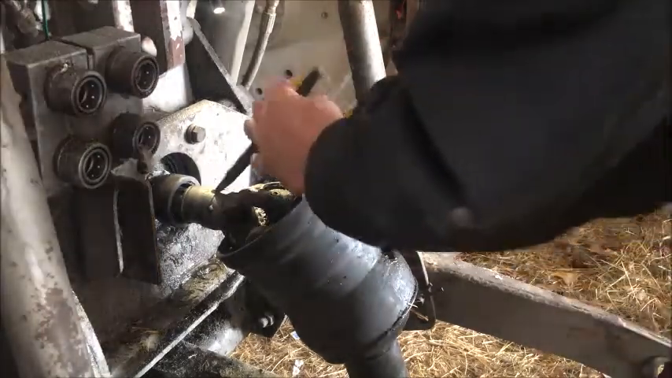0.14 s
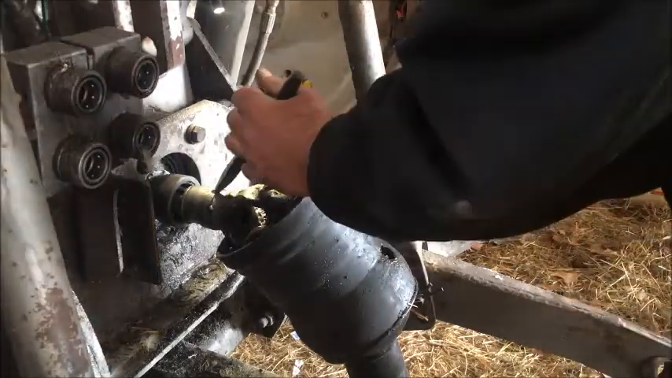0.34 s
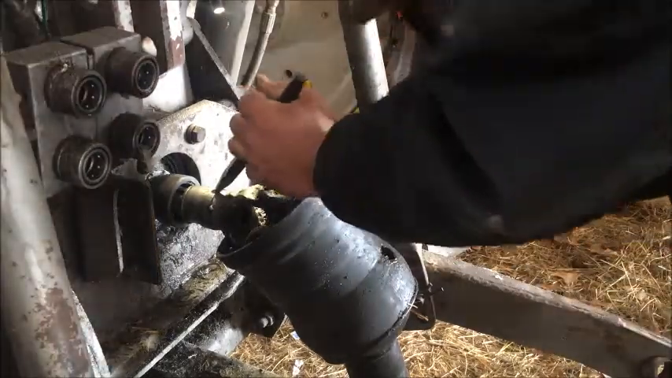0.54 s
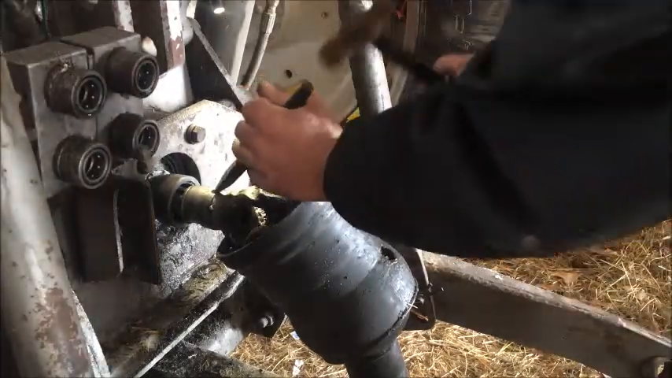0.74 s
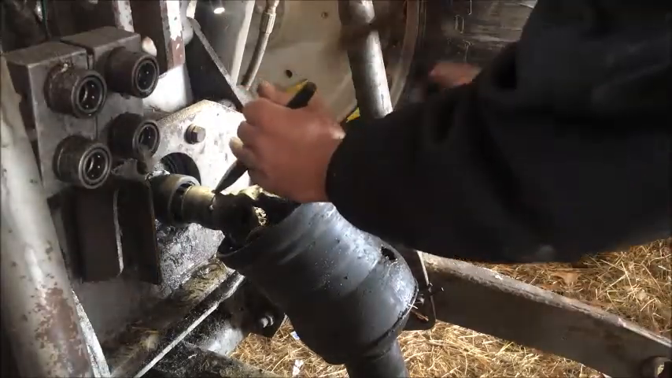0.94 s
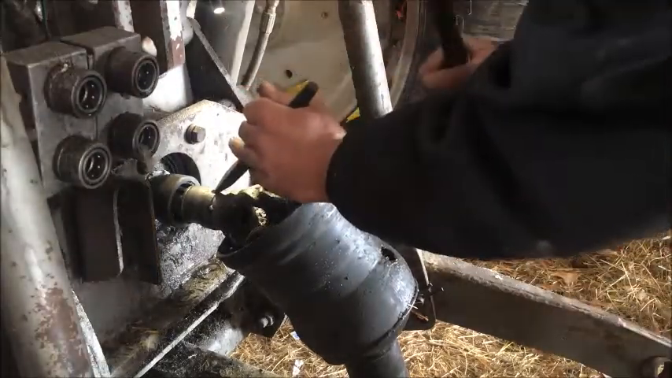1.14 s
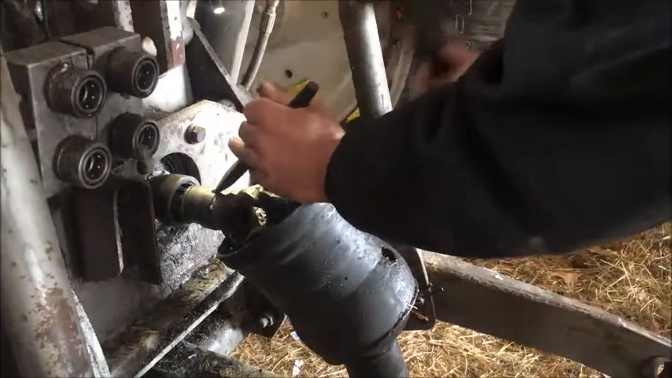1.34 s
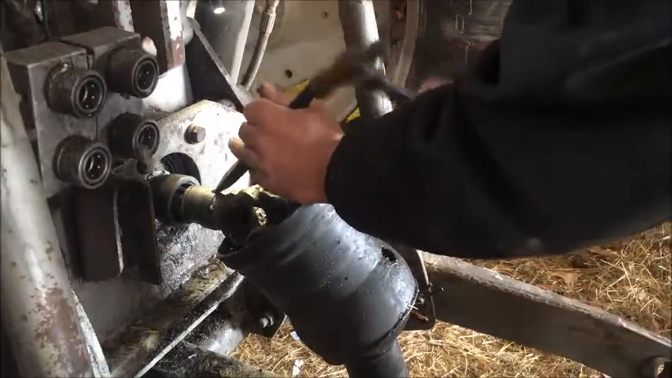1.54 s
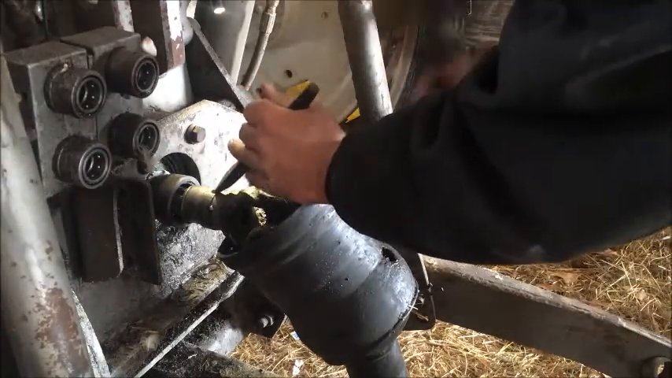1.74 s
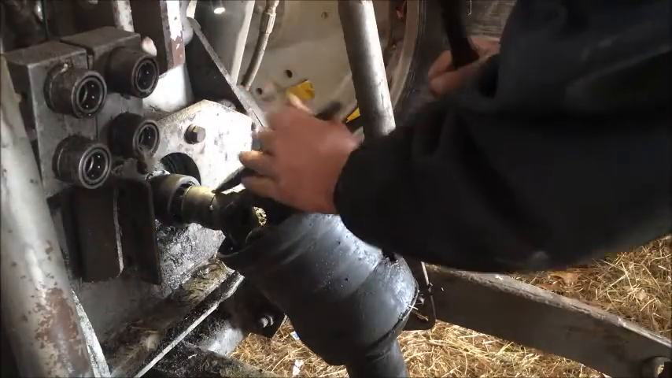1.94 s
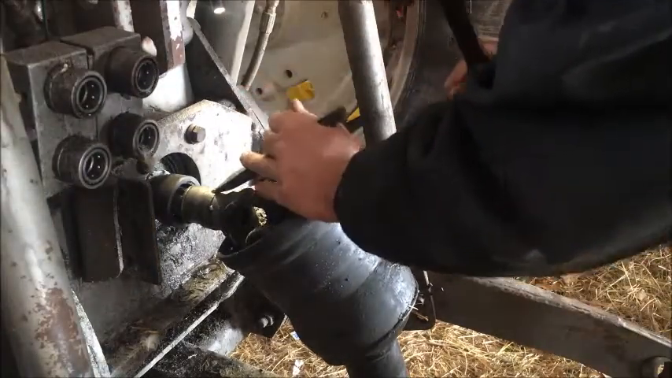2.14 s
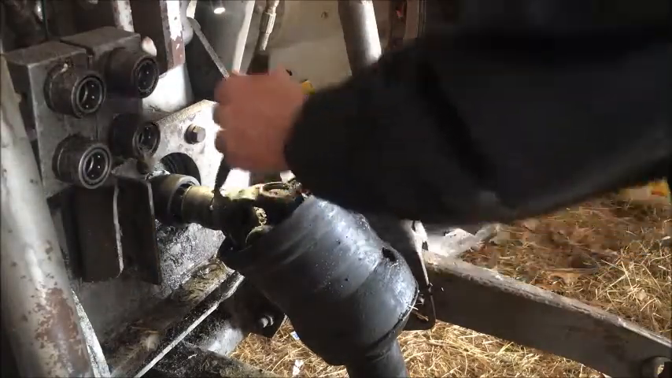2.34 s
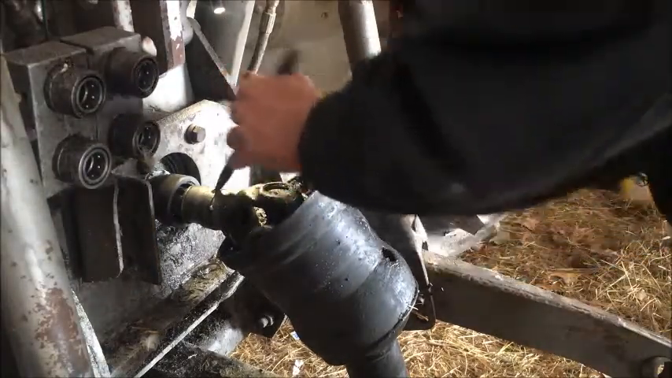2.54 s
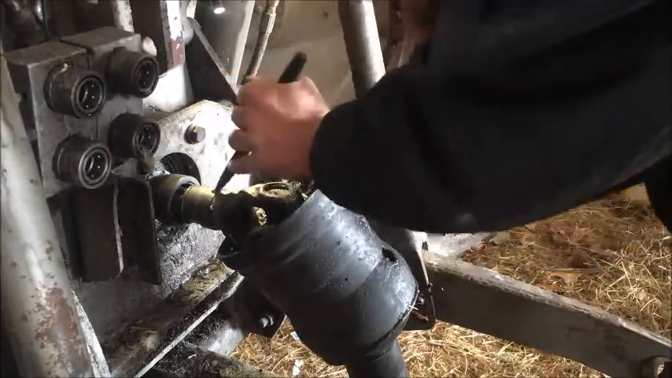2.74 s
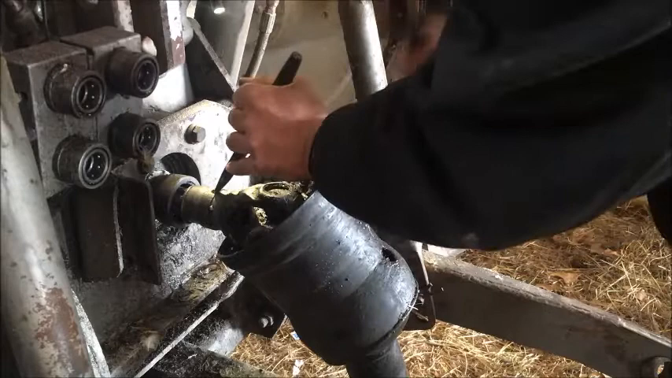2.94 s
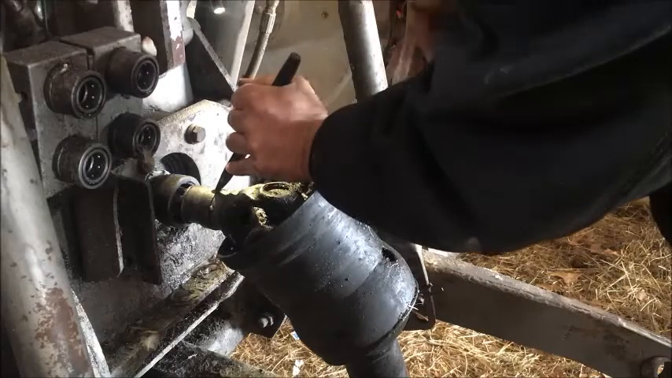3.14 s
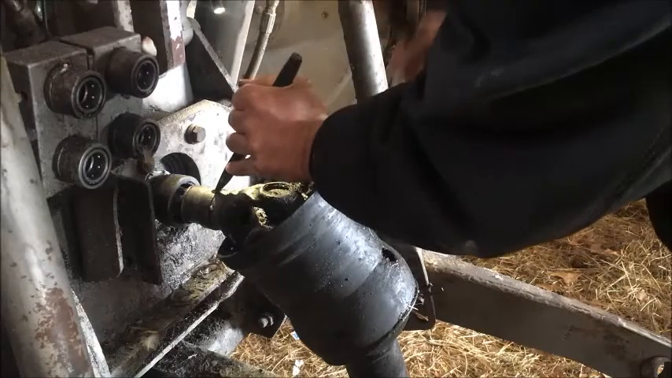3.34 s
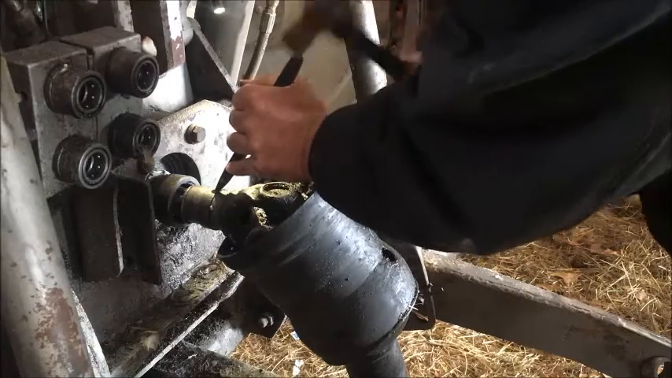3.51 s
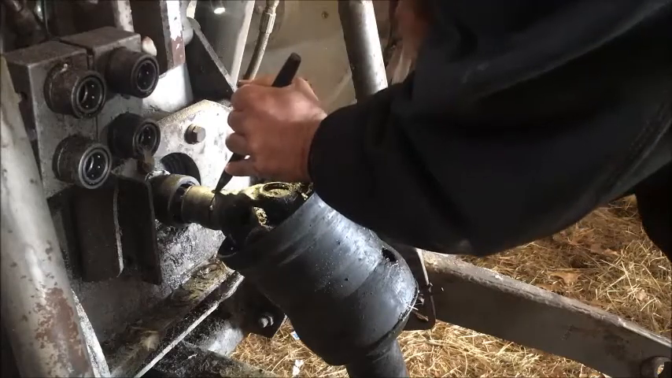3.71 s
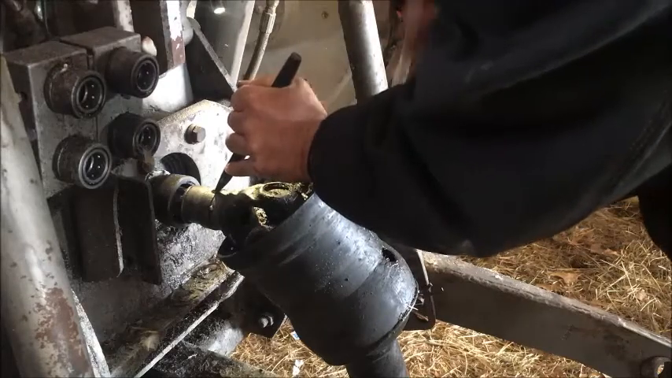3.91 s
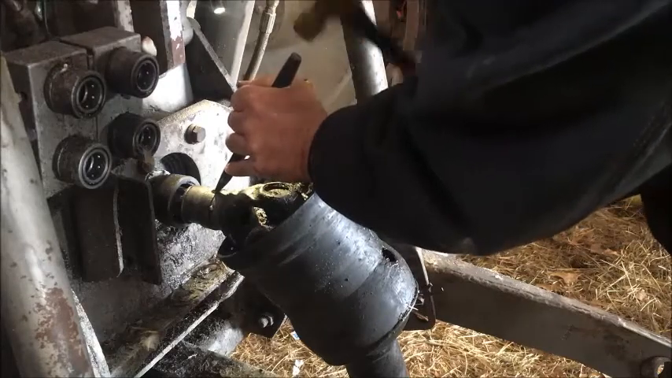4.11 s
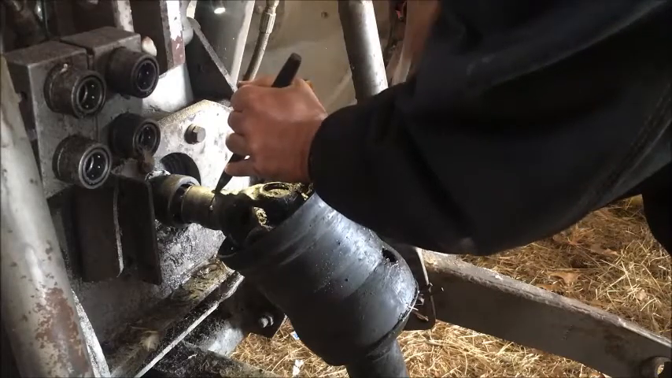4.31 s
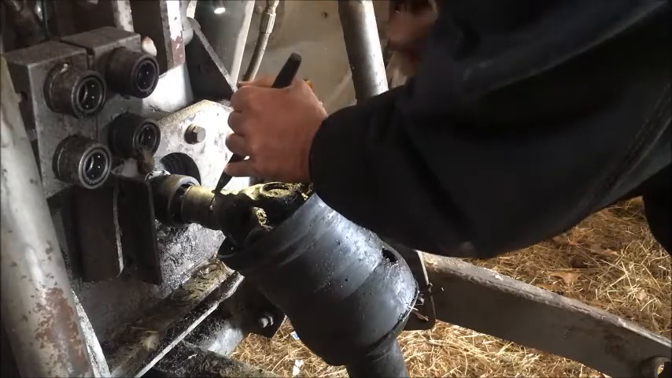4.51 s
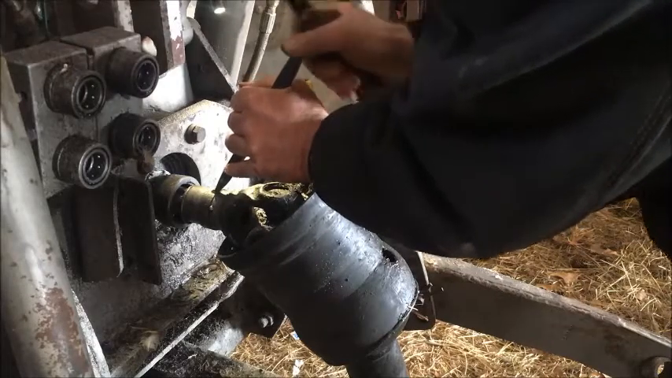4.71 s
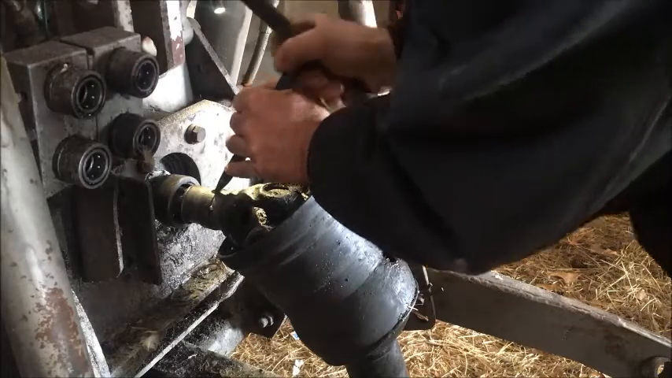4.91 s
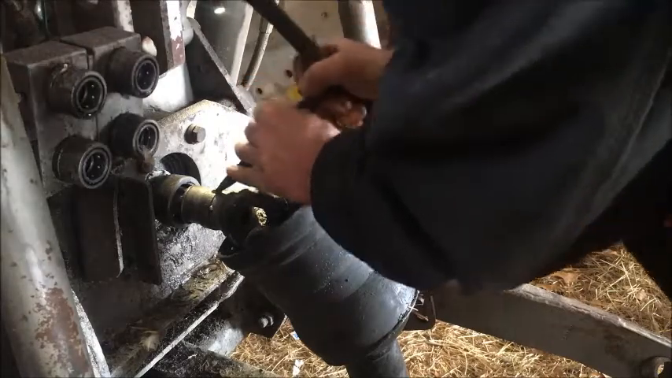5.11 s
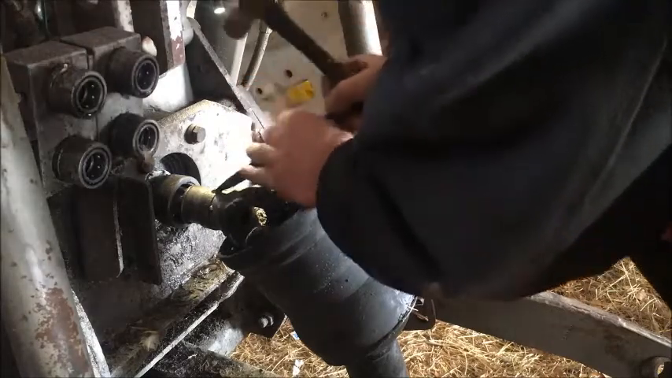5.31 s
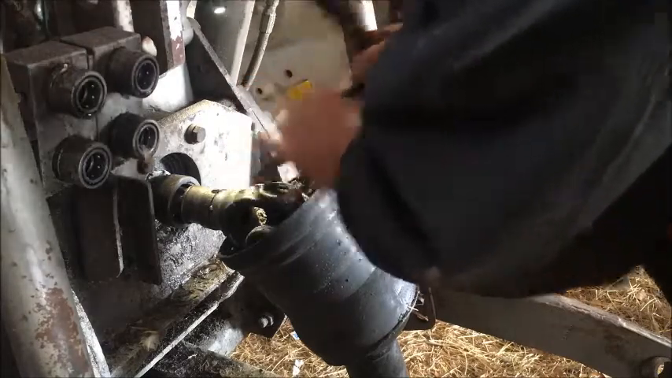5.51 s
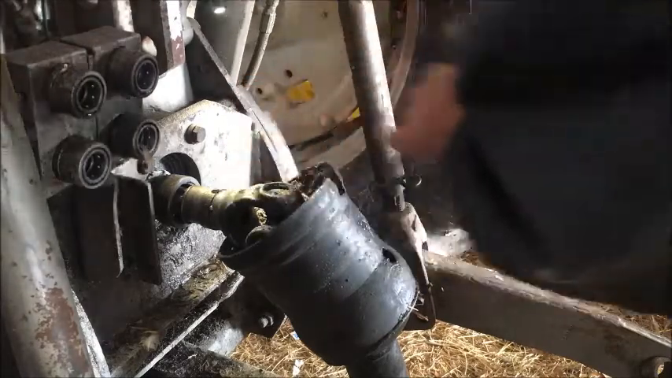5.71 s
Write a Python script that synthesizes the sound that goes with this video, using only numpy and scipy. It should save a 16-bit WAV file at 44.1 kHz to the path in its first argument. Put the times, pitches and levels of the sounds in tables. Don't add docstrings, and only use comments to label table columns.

```python
import sys
import numpy as np
from scipy import signal
from scipy.fft import rfft, irfft
from scipy.io import wavfile
from scipy.ndimage import uniform_filter1d

SR = 44100
rng = np.random.default_rng(int(sys.argv[2]) if len(sys.argv) > 2 else 0)


def store_pcm(level_fs):
    pcm = np.round(np.clip(level_fs, -1, 1) * 32767).astype(np.int16)
    wavfile.write(sys.argv[1], SR, np.atleast_2d(pcm).T)


def boost(x):
    u = np.asarray(x, float) / 20
    return 10 ** u


N = 254009

# (time [s], rate [Hz])
FIRING_RATE = [(0.0, 45.33), (5.76, 44.48)]
# (frequency [Hz], gain [dB])
EXHAUST = [(30, -72), (38, -30.5), (45, -15), (65, -11), (90, -6), (135, -12.5), (180, -34), (225, -16),
           (280, -35), (400, -54), (900, -100)]
# (frequency [Hz], density [dB])
RUMBLE = [(18, -19.5), (30, 1.5), (67, -0.5), (115, -7), (178, -10), (231, -19.5), (392, -30.5),
          (436, -27.5), (700, -31), (910, -60), (1540, -120)]
# (frequency [Hz], density [dB])
CLATTER = [(180, -26), (300, 1.5), (634, -3.5), (701, -6.5), (842, 0.5), (1030, -3.5), (1210, -1),
           (1580, -4.5), (2210, 0.5), (2740, -10.5), (4370, -24.5), (5430, -7), (6960, -19.5),
           (13500, -29.5), (16000, -32)]

# (start [s], length [s], level [dB])
STROKES = [(0.0, 0.18, -61), (0.598, 1.62, -60), (2.6, 2.03, -58.5), (0.166, 0.2, -50.5),
           (0.297, 0.25, -50.5), (0.496, 0.27, -54), (0.752, 0.12, -48.5), (0.84, 0.14, -52),
           (2.03, 0.049, -54), (2.24, 0.052, -53), (2.315, 0.086, -56.5), (2.42, 0.094, -52),
           (2.543, 0.13, -52.5), (2.653, 0.27, -59), (4.636, 0.1, -48), (4.74, 0.27, -54.5),
           (5.012, 0.13, -49.5), (5.217, 0.12, -55), (5.433, 0.18, -49.5), (5.55, 0.45, -45.5)]
# (time [s], level [dB])
CREASES = [
    (0.052, -49),
    (0.092, -53),
    (0.316, -41),
    (0.888, -55),
    (2.656, -56),
    (4.873, -50),
]
# (frequency [Hz], density [dB])
CLOTH = [(1500, -20.5), (3000, 1.5), (6000, 0), (10000, 0.5), (14000, 1), (16000, 3.5)]
# (frequency [Hz], density [dB])
CREASE_SPECTRUM = [(6000, -25), (11000, -14), (15000, 0)]
CLOTH_REST_DB, CREASE_S = -67, 0.005
STROKE_RISE, STROKE_RELEASE_S = 0.47, 0.016

# (time [s], peak [dB], chisel ring [Hz], chisel ring [dB], head roll toward its side [dB])
BLOWS = [
    (1.048, -4, 3140, -13, -1),
    (1.31, -2.5, 3530, 0.5, 0),
    (1.581, -1.5, 3525, 3, 7),
    (1.855, -0.5, 3482, 0, 5.5),
    (3.057, -5, 3110, -5.5, -4),
    (3.332, -2.5, 3350, -16, -3),
    (3.585, -2, 3290, -1.5, 7.5),
    (3.88, -2, 3098, -1, 6),
    (4.165, -2, 3096, -4.5, 2),
    (4.445, -2.5, 3120, -3, 11),
]
# (until [s], overtone [Hz], overtone rise [dB], face ring [dB], thump [dB])
SEATS = [
    (2.5, 6510, 14.5, -2.5, -1),
    (5.76, 6165, 2, 1.5, 0.5),
]
# (frequency [Hz], density [dB])
CRACK = [(150, -43), (250, -23.5), (988, -1.5), (2360, -2.5), (3120, 1), (4570, -3), (5930, -1),
         (6470, -3.5), (7980, -8), (12300, -2.5), (13700, -26), (14900, 3), (16000, -41)]
# (frequency [Hz], rise over crash [dB], t60 [s])
SHAFT = [(144.8, 11.5, 0.21), (201, -3, 0.046), (373, 4.5, 0.022), (507, 7, 0.047), (679, 4.5, 0.05),
         (940, 3, 0.028), (1048, -1.5, 0.049), (1398, 2, 0.046), (1470, -13, 0.022), (3130, -10, 0.13),
         (3390, -2, 0.094), (6470, -10, 0.015)]
# (frequency [Hz], rise over crash [dB], t60 [s])
HEAD = [(11770, 15, .07), (12655, 12, .04)]
# (frequency [Hz], rise [dB], t60 [s])
COLLAR = [(3040, 2.5, 0.077), (3290, -1.5, 0.077)]
# (frequency [Hz], t60 [s])
SHED_T60 = [(150, 0.21), (500, 0.26), (1400, 0.23), (3700, 0.36), (9000, 0.2), (15000, 0.25)]
# (frequency [Hz], density [dB])
WASH = [(59, -57), (100, 1), (185, -2), (266, -12), (801, -6.5), (950, -7.5), (2080, -4.5), (3120, -4.5),
        (5530, -7), (6420, -3.5), (7940, -11), (12700, -15.5), (16000, -13)]
# (frequency [Hz], gain [dB])
GHOST = [(300, 2), (3000, -3.5), (9000, -5.5), (16000, -3)]
SEAT_BRIGHT_DB, SEAT_TOP_DB, SEAT_EDGE_DB = (0.5, 1), (-8, -7), (2, -6)
SEAT_COLLAR_DB, SEAT_GHOST_DB = (-6, 2.5), (-1, 3.5)
CONTACT_DB, CONTACT_S = 3, 0.0004
REBOUND_S, REBOUND_DIP = 0.0022, 0.3
SING_DB, SING_S = -16.5, 0.003
SIDE_DB, EDGE_DB, EDGE_HZ = -1, 8, 14600
FACE_PER_ROLL, EDGE_PER_ROLL = -0.54, -1.1
GHOST_SAMPLES = 1024

# (time [s], knock [dB], knock [Hz], knock ring [dB], thin ring [dB])
TAPS = [
    (2.422, -25.5, 6050, -46, -70),
    (4.692, -35, 3420, -37, -70),
    (5.474, -36, 5950, -48, -62),
    (5.486, -40, 5560, -52, -62),
    (5.497, -43, 9600, -44, -45),
    (5.508, -41, 5100, -46, -36),
    (5.517, -40, 5100, -41, -40),
    (5.526, -27.5, 5300, -34, -35),
    (5.538, -30, 5070, -32, -32),
    (5.562, -41, 5500, -46, -47),
]
# (frequency [Hz], rise [dB], t60 [s])
TOOL = [(1050, 8, 0.006), (1350, 9, 0.006), (3050, 11, 0.01), (3850, 8, 0.008), (5100, 8, 0.006)]
# (frequency [Hz], level [dB], t60 [s])
TINKLE = [(8940, 0, .05), (13190, -4, .05), (15140, -18, .03)]

# (frequency [Hz], density [dB])
DRAG_SPECTRUM = [(600, -27), (1000, -9), (2500, -3), (4000, -14), (5100, 1), (6500, -5), (9500, -11),
                 (14000, -8)]
DRAG_START_S, DRAG_END_S, DRAG_DB = 5.455, 5.565, -49

# (frequency [Hz], density [dB])
STRAW = [(300, -9), (600, 2), (1500, -3), (3000, -7.5), (6000, -8), (12000, -18)]
STEP_S, STEP_RISE_S, STEP_DB = 5.56, 0.031, -49

# (frequency [Hz], gain [dB])
RECORDER_BAND = [(20, -40), (30, -24), (40, 0), (15700, 0), (15900, -24), (16600, -32), (16900, -70)]


def colour(x, points):
    hz, db = np.transpose(points)
    f = np.maximum(np.fft.rfftfreq(len(x), 1 / SR), 1)
    gain = boost(np.interp(np.log(f), np.log(hz), db))
    return irfft(rfft(x) * gain, len(x))


def level(x, db):
    return x * boost(db) / np.sqrt(np.mean(x ** 2))


def walk(rate_hz):
    k = int(SR / rate_hz)
    steps = np.repeat(rng.standard_normal(N // k + 1), k)
    return 1.5 * uniform_filter1d(uniform_filter1d(steps, k), k)[:N]


def add(track, sound, s):
    i = int(round(s * SR))
    track[i:i + len(sound)] += sound[:len(track) - i]


def resonate(x, modes):
    hz, db, t60 = np.transpose(modes)[:, :, None]
    damping = np.log(1000) / t60
    f = np.fft.rfftfreq(len(x), 1 / SR)
    ring = np.sum(boost(db) * damping / (damping + 2j * np.pi * (f - hz)), axis=0)
    return irfft(rfft(x) * (1 + ring), len(x))


def engine():
    s, hz = np.transpose(FIRING_RATE)
    turns = np.cumsum(np.interp(np.arange(N) / SR, s, hz)) / SR
    phase = turns + 0.049 * walk(40)
    starts = np.flatnonzero(np.diff(np.floor(phase)) > 0)
    pulses = np.zeros(N)
    pulses[starts] = boost(2.2 * rng.standard_normal(len(starts)))
    exhaust = level(colour(pulses, EXHAUST), -42)
    boom = level(np.cos(2 * np.pi * turns) * boost(1.5 * walk(9.2)), -38.5)
    rumble = level(colour(rng.standard_normal(N), RUMBLE), -41)
    throb = 1 + 0.061 * np.cos(2 * np.pi * phase)
    clatter = colour(rng.standard_normal(N) * throb * boost(0.7 * walk(6)), CLATTER)
    return exhaust + boom + rumble + level(clatter, -50.5)


def sleeve():
    t = np.arange(N) / SR
    start, length, db = np.transpose(STROKES)[:, :, None]
    rise = np.clip((t - start) / (STROKE_RISE * length), 0, 1)
    stop = np.exp(-np.maximum(t - start - length, 0) / STROKE_RELEASE_S)
    rub = np.sqrt(boost(CLOTH_REST_DB) ** 2 + np.sum((boost(db) * rise * stop) ** 2, axis=0))
    grains = rng.standard_normal(N) * boost(1.2 * rng.exponential(size=N))
    s, db = np.transpose(CREASES)[:, :, None]
    snaps = np.sum(boost(db) * np.exp(-((t - s) / CREASE_S) ** 2), axis=0)
    sliding = level(colour(grains, CLOTH), 0.5) * rub
    return sliding + level(colour(grains, CREASE_SPECTRUM), 0) * snaps


def chatter(t):
    loose = 1 / (1 + np.exp(np.clip((t - 0.0115) / 0.0015, -50, 50)))
    loose = loose * (1 - REBOUND_DIP * np.exp(-(t / REBOUND_S - 1) ** 2 * 2))
    bounce = loose * np.exp(-t / 0.05) + 0.35 * np.exp(-t / 0.0011) + 0.13 * np.exp(-t / 0.04)
    uneven = boost(2.5 * rng.standard_normal(len(t) // 32 + 1).repeat(32)[:len(t)])
    return colour(bounce * uneven * rng.standard_normal(len(t)), CRACK)


def shed(t):
    hz, t60 = np.transpose(SHED_T60)
    noise = colour(rng.standard_normal(len(t)), WASH)
    noise = noise / np.std(noise)
    out = 0
    for f in 100 * 2 ** np.arange(8):
        octave = [(f / 2, -60), (f / 2 ** 0.5, -6), (f, 0), (f * 2 ** 0.5, -6), (f * 2, -60)]
        decay = boost(-60 * t / np.interp(np.log(f), np.log(hz), t60))
        build_up = 1 - np.exp(-t * f)
        out = out + colour(noise, octave) * decay * build_up
    return out


def hammer_blow(t, run, chisel_hz, chisel_db, roll_db):
    _, over_hz, over_db, face_db, thump_db = SEATS[run]
    crack = chatter(t)
    contact = boost(CONTACT_DB) * np.exp(-t / CONTACT_S) * np.sign(crack)
    chisel = [(chisel_hz, 12 + chisel_db, 0.035), (over_hz, over_db, 0.02), (over_hz * 1.1, over_db - 3.5, 0.02)]
    swell = boost(SING_DB + chisel_db) * (t / SING_S) ** 4 * np.exp(-t / SING_S)
    sing = swell * np.sin(2 * np.pi * chisel_hz * t)
    collar = [(hz, rise_db + SEAT_COLLAR_DB[run], t60) for hz, rise_db, t60 in COLLAR]
    wash = boost(-5.5) * resonate(shed(t), collar)
    crash = resonate(crack / np.std(crack[:512]), chisel) + contact + sing + wash
    (face_hz, face_rise, face_t60), (side_hz, side_rise, side_t60) = HEAD
    head = [(face_hz, face_rise + face_db + FACE_PER_ROLL * abs(roll_db), face_t60),
            (side_hz, side_rise + SIDE_DB + roll_db, side_t60),
            (EDGE_HZ, EDGE_DB + SEAT_EDGE_DB[run] + EDGE_PER_ROLL * roll_db, 0.08)]
    tilt = [(6000, 0.0036), (14500, SEAT_BRIGHT_DB[run]), (15800, SEAT_TOP_DB[run])]
    blow = colour(resonate(crash, SHAFT + head), tilt)
    lows = colour(blow, [(900, 0), (2200, -30)])
    thump = boost(thump_db) * lows * (1 - np.exp(-t / 0.0012))
    return (blow - lows + thump) * np.clip((t[-1] - t) / 0.1, 0, 1)


def blows():
    t, track = np.arange(int(0.4 * SR)) / SR, np.zeros(N)
    lead_s = GHOST_SAMPLES / SR
    quarter = GHOST_SAMPLES // 4
    for s, db, chisel_hz, chisel_db, roll_db in BLOWS:
        run = int(s > SEATS[0][0])
        blow = hammer_blow(t, run, chisel_hz, chisel_db, roll_db)
        blow = blow * boost(db) / np.std(blow[:512])
        add(track, boost(-6) * blow, s)
        ghost = boost(SEAT_GHOST_DB[run]) * colour(blow, GHOST)[:GHOST_SAMPLES]
        ghost = ghost * np.exp(-t[:GHOST_SAMPLES] / 0.0045)
        add(track, boost(-35) * ghost, s - lead_s)
        add(track, boost(-39) * ghost, s - lead_s / 2)
        reversed_onset = (blow * np.exp(-t / 0.0026))[quarter::-1]
        add(track, boost(-31) * reversed_onset, s - lead_s / 4)
    return track


def taps():
    t, track = np.arange(int(0.15 * SR)) / SR, np.zeros(N)
    hz, ring_db, t60 = np.transpose(TINKLE)[:, :, None]
    tick_spectrum = [(500, -20), (900, -0.5), (7000, -17), (14000, -28)]
    for s, db, knock_hz, knock_db, thin_db in TAPS:
        tick = np.exp(-t / 0.003) * colour(rng.standard_normal(len(t)), tick_spectrum)
        knock = boost(knock_db - 60 * t / 0.025) * np.sin(2 * np.pi * knock_hz * t)
        thin = np.sum(boost(thin_db + ring_db - 60 * t / t60) * np.sin(2 * np.pi * hz * t), axis=0)
        add(track, (boost(db) * resonate(tick, TOOL) + knock + thin) * (1 - t / t[-1]), s)
    return track


def drag():
    t = np.arange(N) / SR
    progress = np.clip((t - DRAG_START_S) / (DRAG_END_S - DRAG_START_S), 0, 1)
    push = np.maximum(np.sin(np.pi * progress), 0) ** 0.5
    grains = rng.standard_normal(N) * boost(3.4 * rng.exponential(size=N) + 2.2 * walk(150))
    return level(colour(grains, DRAG_SPECTRUM), DRAG_DB) * push


def straw():
    t = np.arange(N) / SR
    grains = rng.standard_normal(N) * boost(1.5 * rng.exponential(size=N) + 1.5 * walk(40))
    return level(colour(grains, STRAW), STEP_DB) * np.clip((t - STEP_S) / STEP_RISE_S, 0, 1)


def scene():
    return (engine() + sleeve() + blows() + taps() + drag() + straw())[None]


def low_pass(x):
    return signal.sosfilt(signal.butter(12, 16820, fs=SR, output="sos"), x)


def record(dry):
    overloads = np.cumsum(np.abs(dry[0]) > 0.4)
    hold = int(0.193 * SR)
    held = (overloads > np.r_[np.zeros(hold), overloads[:-hold]]) * 1.0
    quick = signal.lfilter([1 / 200], [1, 1 / 200 - 1], held)
    slow_rate = 1 / (0.7 * SR)
    slow = signal.lfilter([slow_rate], [1, slow_rate - 1], held)
    x = dry[0] * boost(-3.2 * quick - 1.2 * slow)
    x = np.tanh(0.91 * colour(x, RECORDER_BAND)) / 0.79
    x = colour(np.clip(x, -0.94, 0.94), [(16020, 0), (16720, -12), (16820, -60)])
    return low_pass(np.clip(x[None], -1, 1))


dry = scene()
out = record(dry)
store_pcm(out)
```